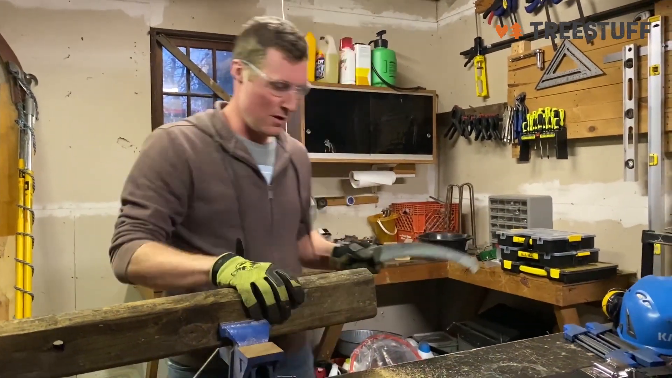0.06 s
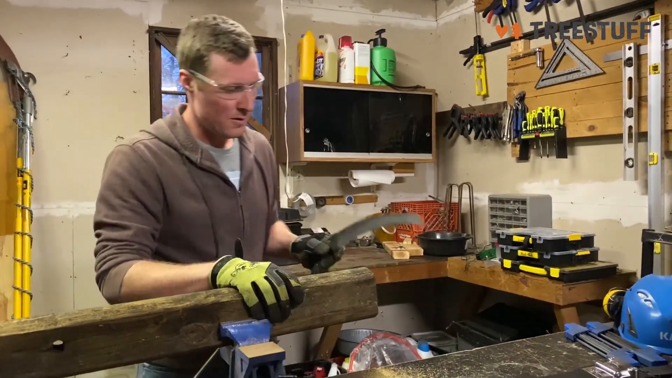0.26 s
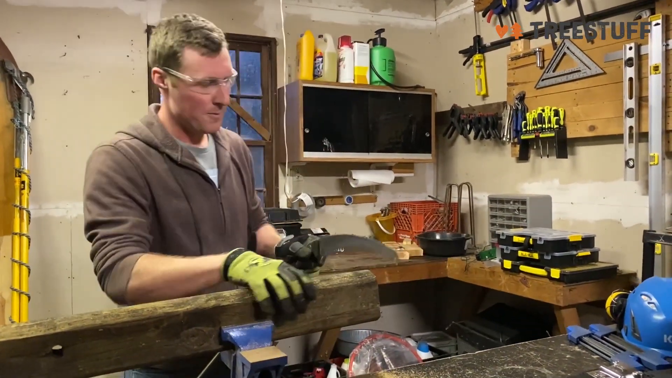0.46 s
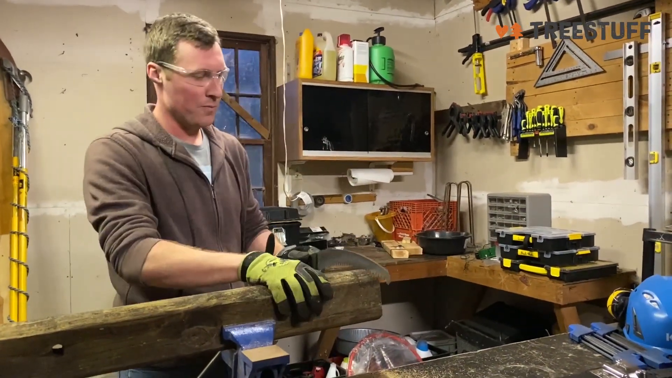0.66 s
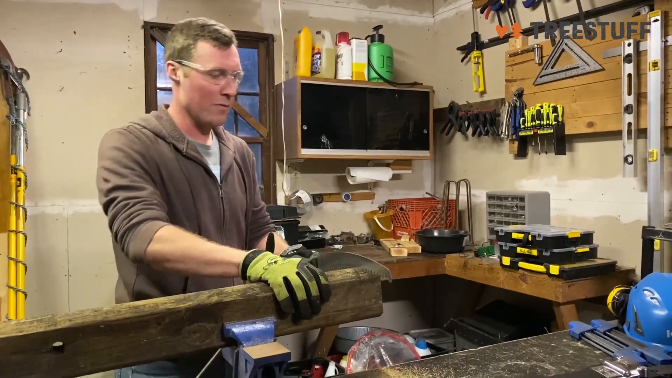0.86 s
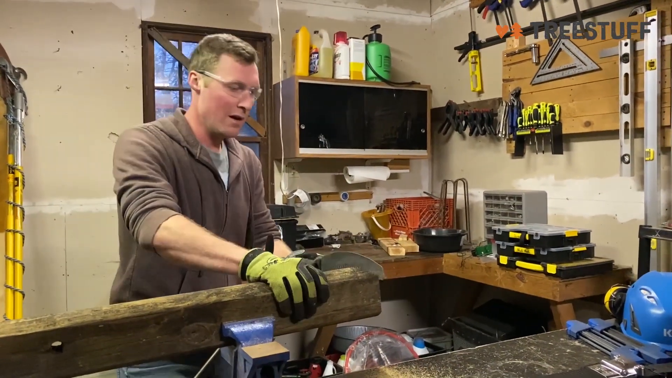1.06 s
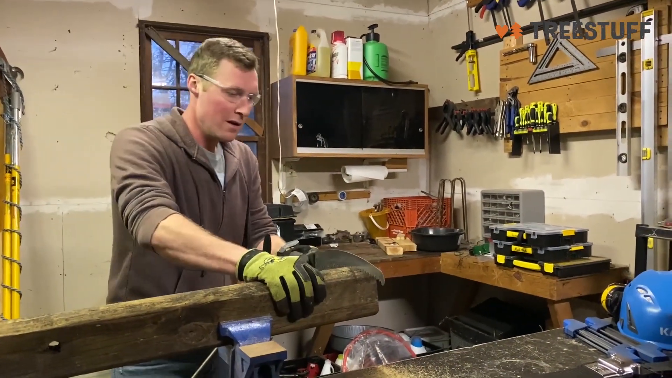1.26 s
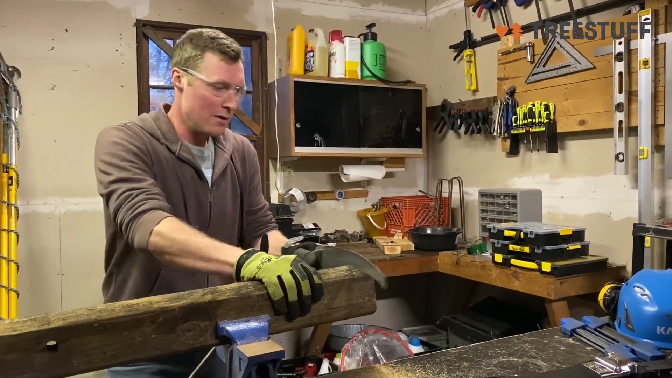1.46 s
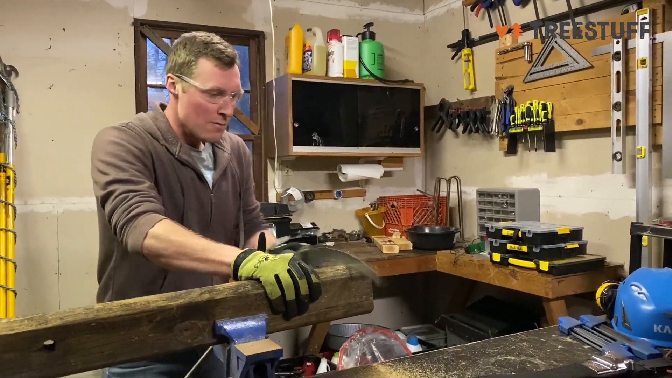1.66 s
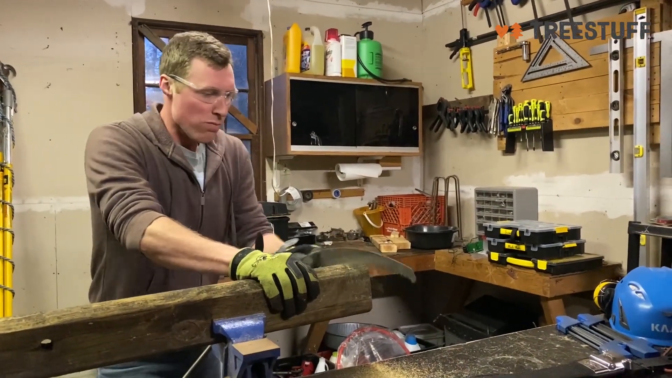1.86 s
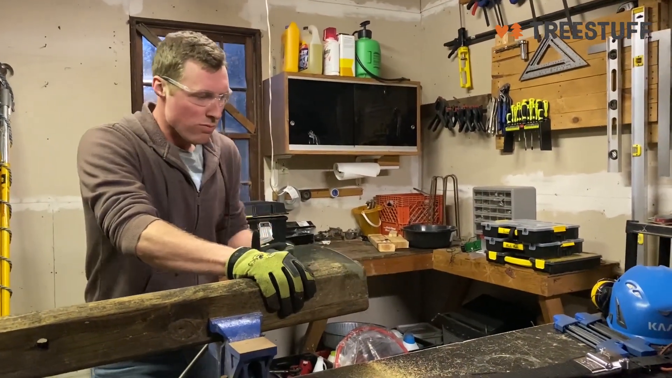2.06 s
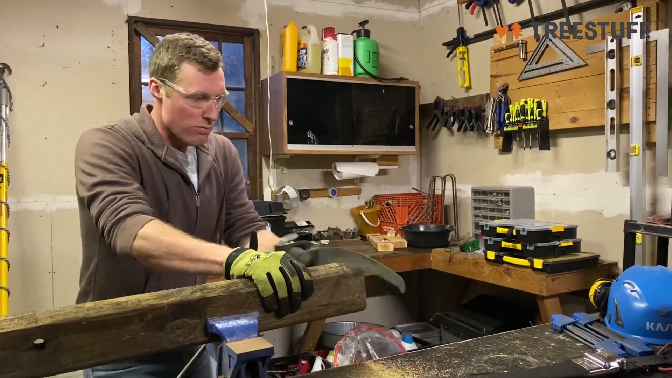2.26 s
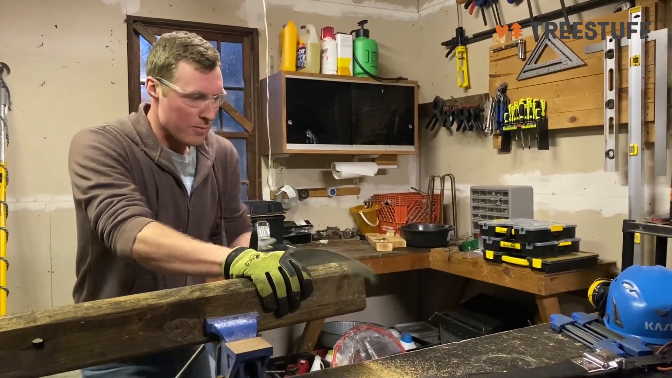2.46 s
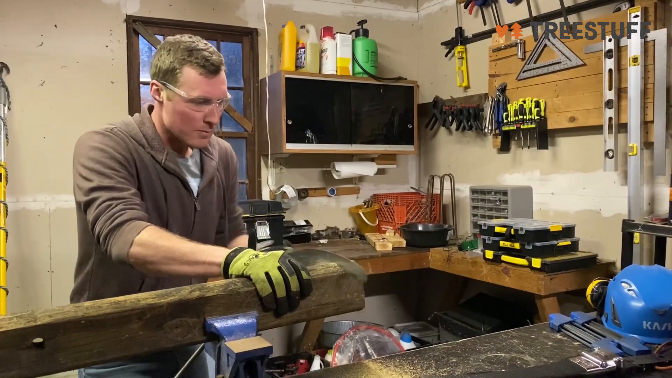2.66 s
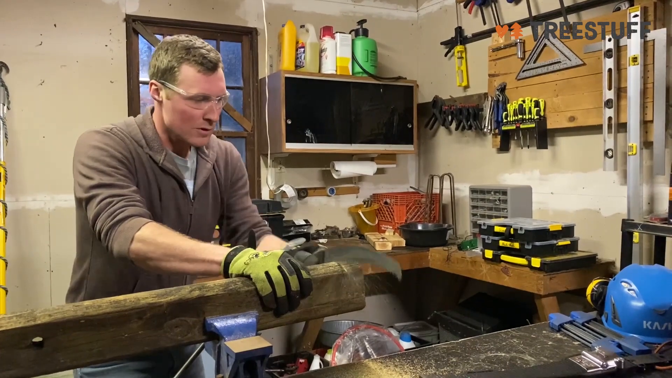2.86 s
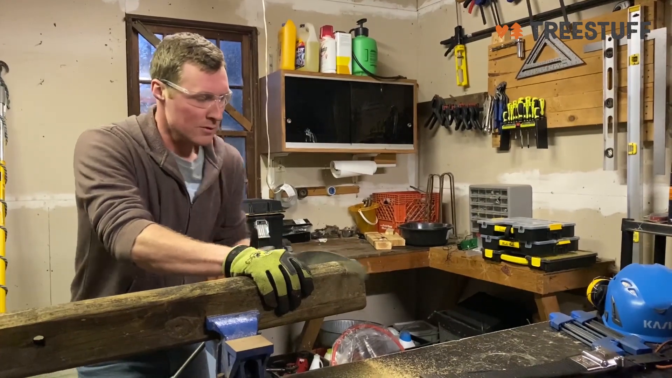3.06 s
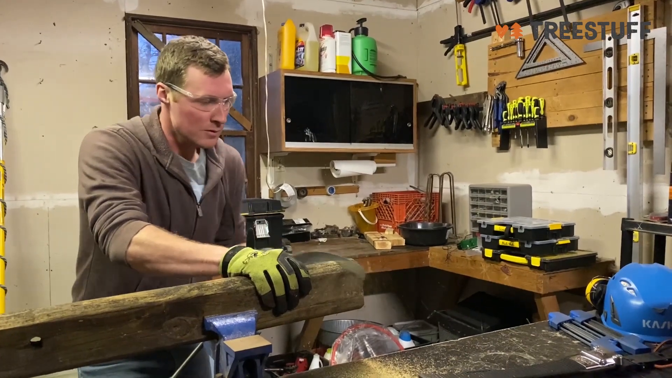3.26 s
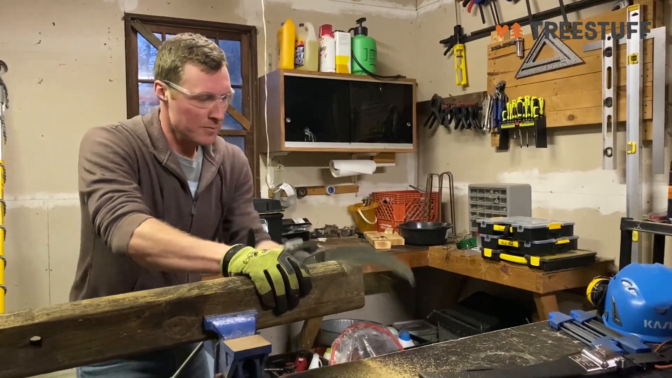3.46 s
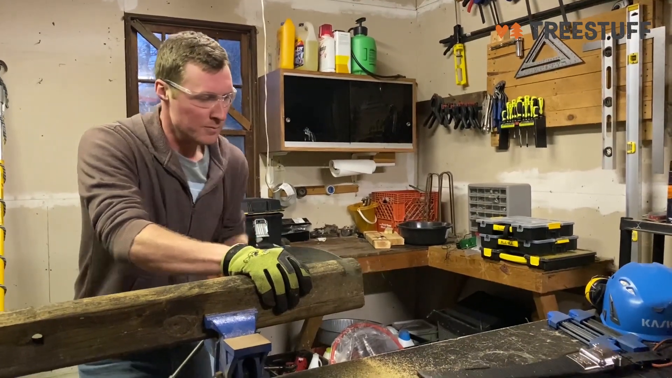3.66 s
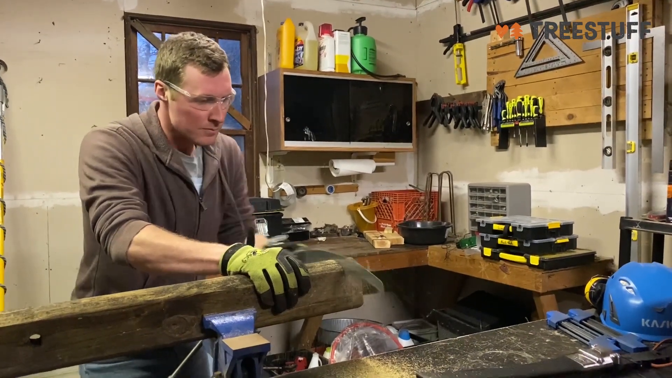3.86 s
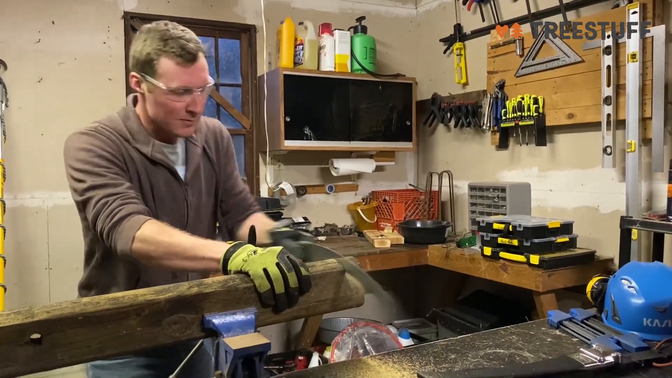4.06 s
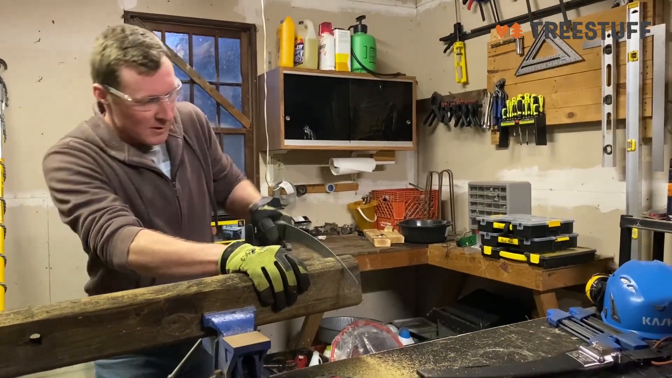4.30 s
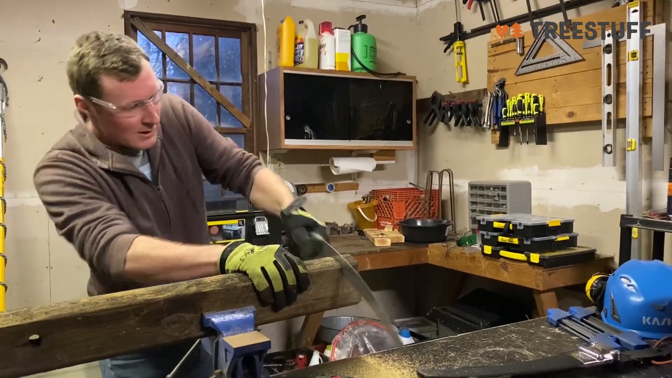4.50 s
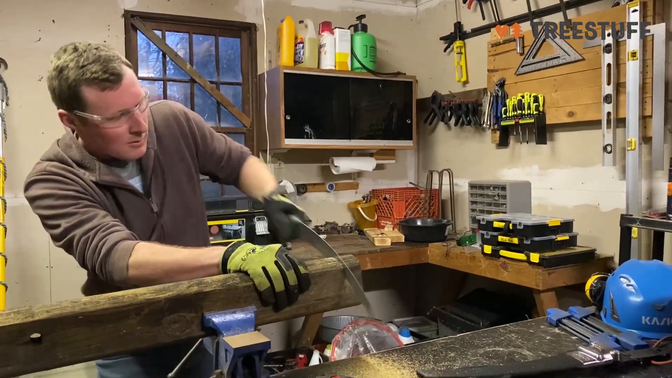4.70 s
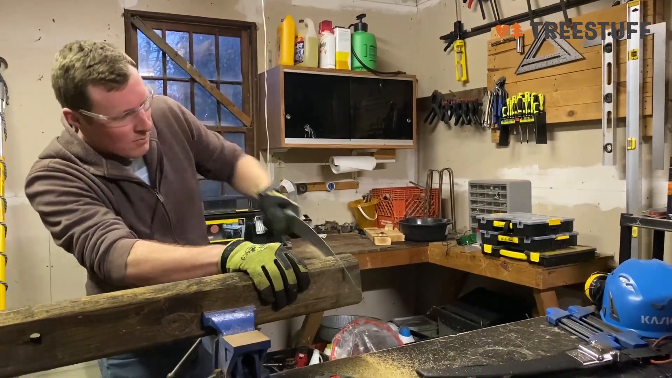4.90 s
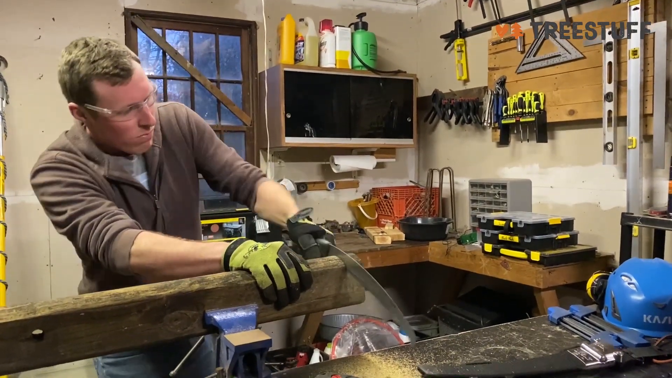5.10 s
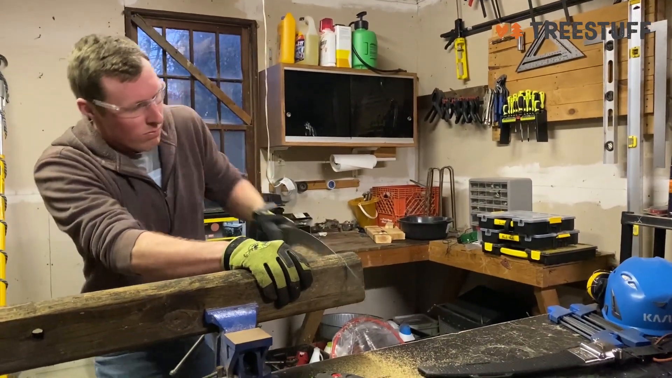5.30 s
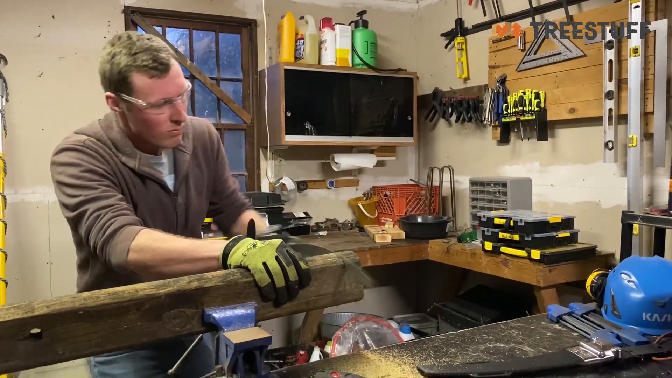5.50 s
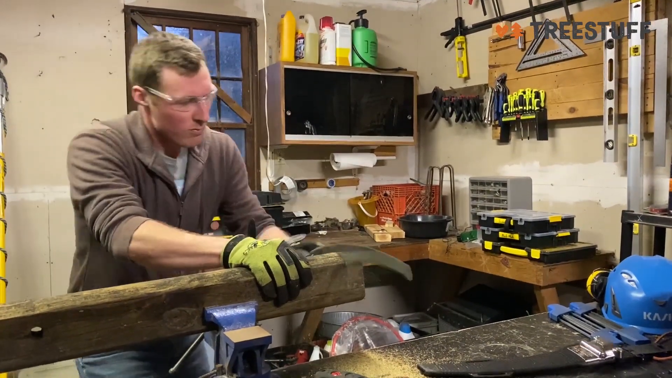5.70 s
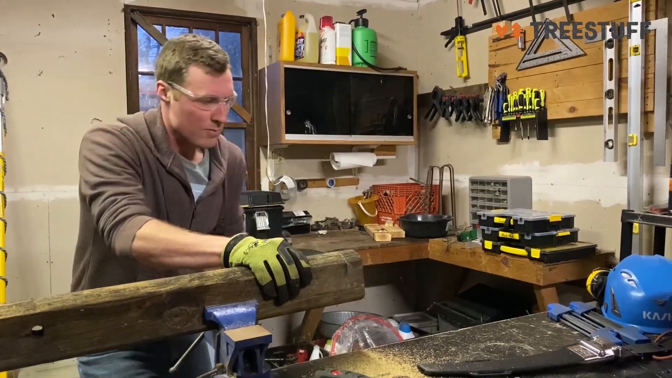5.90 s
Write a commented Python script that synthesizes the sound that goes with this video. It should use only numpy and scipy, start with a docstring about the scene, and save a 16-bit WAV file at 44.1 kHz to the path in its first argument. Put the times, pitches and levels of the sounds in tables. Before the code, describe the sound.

Quiet indoor room noise with faint mains hum. From 0 to 1.5 s, gloves and a saw blade make small dry scuffs on a wooden beam, with steely ticks near 0.13 and 0.5 s, a firm hollow bump with a short rattle at 0.8 s and softer bumps near 0.9, 1.25 and 1.5 s. At 1.5 s sawing begins and continues to 6 s without a real pause: 28 alternating pushes and pulls, each about 0.15 s. Teeth knock the beam into a rough woody buzz around 200-700 Hz; each stroke swells and speeds up midway. Pulls tear more loudly, with gritty mid-range rasp, wavering blade resonance and airy dust hiss, which grows stronger after about 3 s. Bright cracks punctuate some strokes, notably near 2.0, 3.3 and 4.6 s. The vice and bench shudder low underneath. Close stereo pickup, slightly left-weighted, with short room reflections.

```python
"""Over faint room noise and mains hum, gloves and a saw blade slide, tick and bump on a dry beam in a vice.
Then a curved hand saw cuts the beam in quick push and pull strokes: each tooth knocks the ringing beam
and releases a burst of tearing fibres; blade and dust hiss, the bench shakes.
Noise through damped modes and spectral curves, keyed stroke by stroke, reaches two close microphone ports."""
import sys
import numpy as np
from scipy import signal
from scipy.fft import rfft, irfft, next_fast_len
from scipy.io import wavfile
from scipy.ndimage import uniform_filter1d

SR = 44100
rng = np.random.default_rng(int(sys.argv[2]) if len(sys.argv) > 2 else 0)


def transcribe(u):
    """Save the signal u as a 16-bit wav file named by the first command-line argument.

    u: samples, shape (n,) or (channels, n), limited to [-1, 1]; the rate is SR.
    q: integer samples, one column per channel.
    """
    v = np.clip(np.atleast_2d(u).T, -1, 1)
    q = np.round(v * 32767).astype(np.int16)
    wavfile.write(sys.argv[1], SR, q)


def level_to_linear(level):
    """Convert decibel levels to linear amplitude factors, elementwise."""
    exponent = np.asarray(level, float) / 20
    return 10 ** exponent


N = 261954

# room air spectrum: freq_hz, relative_density_db
AIR_CURVE = [(18, -37), (30, 8), (71, 6.5), (199, -6), (473, -8.5), (532, -11.5), (720, -13.5),
             (1180, -18.5), (3070, -28.5), (8000, -34), (10400, -68), (17600, -120)]
AIR_DB = -44
# mains partials: freq_hz, level_db
HUM_PARTIALS = [(360, -63), (479.5, -57.5), (720, -63.5), (840, -66.5)]

# gloves and blade slide over the wood before the cut: start_s, rise_s, hold_s, level_db, thin_top_db
SLIDES = [(-.02, 0.011, .01, -45, -50), (0.095, 0.026, .005, -48, -49), (.205, 0.074, 0.016, -49.5, -47.5),
          (0.373, 0.014, 0.03, -48.5, -40.5), (0.475, .006, 0.025, -42, -58), (0.514, 0.021, .01, -42, -56),
          (0.578, .05, .05, -44.5, -53), (.8, .006, 0.057, -58, -54), (1.152, 0.019, 0.018, -48.5, -49),
          (1.25, 0.011, .004, -38.5, -44), (1.491, .004, 0.016, -59, -55)]
# thin top of sliding and of bright cracks: freq_hz, gain_db
THIN_TOP_CURVE = [(300, -38), (1000, 11.5), (4000, 5.5), (8000, 10), (12000, 4.5), (15700, 4), (15900, -45)]
SLIDE_HZ, SLIDE_WIDTH_HZ = 2620, 2600
RISE_DB, FADE_DB_PER_S, TOP_FADE_DB_PER_S = 18, 195, 260
REST_DB, TOP_REST_DB = -66, -64  # the hand never lies quite still

# tooth tips tick on the wood: start_s, level_db, pitch_hz
TOOTH_TICKS = [(0.1176, -40, 2570), (0.1358, -22, 2980), (0.4808, -16, 3200), (0.4877, -22, 2990),
               (0.502, -27, 2480), (0.804, -29.5, 1710), (1.258, -24, 1980), (1.4934, -40, 2570)]
# short bright cracks with a brief ring, two clicks before the cut, the rest at stroke onsets or
# within strokes: start_s, level_db, ring_hz
BRIGHT_CRACKS = [(0.8015, -31.5, 12100), (0.9687, -38, 14800), (1.5254, -36, 2960), (1.668, -27, 7500),
                 (2.0202, -9.5, 4750), (2.0244, -16, 2570), (2.3483, -15, 7580), (2.3657, -11, 2570),
                 (3.003, -12, 2960), (3.288, -8, 2544), (3.5927, -12, 3388), (3.931, -15, 2980),
                 (4.642, -4, 2890), (4.9077, -9, 2730), (5.139, -6, 5496), (5.339, -12, 3390)]
# the beam is bumped: start_s, level_db, ring_centre_hz, spread_octaves, rattle_t60_s
BEAM_BUMPS = [(.804, -12, 371, 0.27, 0.14), (.882, -26, 360, 0.67, 0.043), (1.255, -27.5, 676, 0.43, 0.058),
              (1.503, -21, 251, 0.43, 0.083)]
# beam in the vice: freq_hz, width_hz, relative_db
BEAM_MODES = [(214, 41, 2.5), (242, 50, 0), (294.8, 9.5, 3.5), (321.3, 52, -1.5), (350.5, 21, -2),
              (391.4, 21, 5), (417, 70, -5.5), (514, 63, 1), (684.4, 3.7, 7), (684, 45, -51)]

# strokes, push and pull in turn:
# start_s, knock_db, early_teeth_hz, late_teeth_hz, tearing_db, hiss_db, bench_db
STROKE_SETTINGS = [(1.5, -13, 299, 221.6, -27.5, -38, -26.5), (1.655, -20, 283.8, 312, -22.5, -34.5, -23.0),
                   (1.851, -15, 394.2, 221.2, -26, -34.5, -25.5),
                   (2.006, -20, 284.1, 308.7, -25, -32.5, -24),
                   (2.194, -13, 214.2, 253.5, -25.5, -34.0, -27),
                   (2.335, -20.5, 240, 325, -22.5, -32, -28.5), (2.521, -13.5, 310, 296.5, -25.5, -33, -30),
                   (2.664, -19.0, 295.1, 297.4, -22, -32.5, -29.0),
                   (2.836, -13, 345, 317.4, -24.5, -32, -27), (2.976, -19, 360.4, 298.8, -20, -31.5, -19.5),
                   (3.142, -17.5, 350, 395, -25, -30.0, -26.5), (3.273, -20, 330.4, 390, -20, -32, -23),
                   (3.439, -13.5, 300, 400, -25.5, -32, -26.5),
                   (3.578, -21.5, 305.3, 396.4, -21, -31.5, -23),
                   (3.754, -17.5, 326.3, 419, -25, -32.0, -24.5),
                   (3.903, -18, 324.9, 383.4, -21.5, -32.5, -29.5),
                   (4.081, -15.5, 367, 402.6, -26.5, -31.5, -29.5),
                   (4.236, -16.5, 380, 295, -22.5, -32.5, -33),
                   (4.419, -14.5, 312.2, 395, -27, -31.5, -20.5),
                   (4.577, -16, 258.3, 329.3, -24, -34.0, -23.5),
                   (4.757, -16, 347.7, 349, -27.5, -30.0, -20.5),
                   (4.895, -15.5, 350, 385.8, -22.0, -31.5, -26.5),
                   (5.068, -18, 335.2, 400, -28.5, -28.5, -24),
                   (5.22, -18.5, 388, 395, -21.0, -31.5, -26.5), (5.392, -18.0, 319, 394, -26.5, -29, -26),
                   (5.523, -18.5, 249.6, 324.3, -22.5, -33, -26),
                   (5.687, -15, 285, 339.7, -25.5, -31.5, -33.5),
                   (5.826, -19.5, 321.4, 330, -20.5, -30, -29.5)]
LAST_S = 6.0  # end of the last stroke
# course of a push: stroke_share_0_1, knock_db, early_to_late_speed_0_1, tearing_db, hiss_db, bench_db
PUSH_COURSE = [(0, -6.5, 0.05, 1.5, -5, -9), (.15, -3.5, 0.02, 2, -3.5, 4.5), (.4, 2.5, .1, 4, 1.5, 5.5),
               (.6, 4.5, .8, 4.5, 4, -4.5), (.8, -1.5, .98, 1.5, 1.5, -2.5), (1, 0.5, 0.94, -3, -6.5, 4)]
# course of a pull: stroke_share_0_1, knock_db, early_to_late_speed_0_1, tearing_db, hiss_db, bench_db
PULL_COURSE = [(0, -5, 0.034, -11, -6.5, -10), (.1, -0.5, 0.023, -1.5, 0.5, -1),
               (.3, 2.5, 0.099, 3, 5, 7.5), (.6, 4.5, .8, 4.5, 3, -1), (.8, 2.5, .98, 0, -2, -2.5),
               (1, -6.5, .98, -4, -10.5, -0.5)]
# the hand halts longer at some turns, so the level dips: centre_s, depth_db, half_length_s
HAND_HALTS = [(1.842, -2.5, 0.017), (2.003, -3, .018), (4.239, -1.5, 0.018), (4.42, -2.5, 0.023),
              (4.566, -1, 0.022), (4.768, -4, 0.025), (5.076, -6.5, 0.026), (5.69, -1, 0.025)]
# the hiss swells briefly within a stroke, from not at all to strongly: centre_s, rise_db, half_length_s
HISS_SWELLS = [(1.55, 4, 0.011), (1.73, 0.5, 0.013), (1.9, 9.5, 0.023), (2.045, 4, .03), (2.24, 5.5, .025),
               (2.365, 3, 0.0081), (2.57, 1, 0.018), (3.21, 0.5, 0.017), (3.54, 0, 0.019),
               (3.81, 6.5, 0.02), (3.935, 2.5, .008), (4.475, 3, 0.0093), (5.175, 6, .012),
               (5.78, 3, 0.021)]
BLEND_S = 0.013  # one stroke melts into the next
START_S, START_DB = 0.039, -44  # the first stroke grows out of rest
CHATTER_DB, ROCK_DB = 1.5, 3.5  # the bite and the bench waver within a stroke

# wood fibres tearing: freq_hz, gain_db
TEAR_CURVE = [(300, -6), (600, 3), (1100, -2), (1800, -14.5), (3000, -11.5), (5000, -21), (8000, -54)]
# teeth on the kerf walls: freq_hz, gain_db
RASP_CURVE = [(500, -50), (1200, -15), (2500, 3.5), (3500, -2), (5000, -1.5), (7000, -1), (9000, -55),
              (11000, -24), (13000, -70)]
# blade in the kerf: freq_hz, width_hz, relative_db
BLADE_MODES = [(1185, 150, 3.5), (1460, 43, 5), (1336, 140, 7), (1644, 167, 15), (1982, 82, 13),
               (2570, 49, 14.5), (2990, 270, 9.5), (3490, 79, 13), (4475, 260, 9.5)]
# blade and dust: freq_hz, gain_db
HISS_CURVE = [(1000, -56), (3000, -2), (6000, -1), (8000, 6.5), (9500, -5.5), (12500, -3.5), (15000, -8.5),
              (15700, -10), (15900, -40), (16600, -55)]
# vice and bench top: freq_hz, width_hz, relative_db
BENCH_TOP_MODES = [(62, 20, -26), (90, 21.4, 8.5), (148, 102, 2)]

# room decay: freq_hz, t60_s
ROOM_DECAY = [(150, 0.14), (400, 0.62), (1000, 0.093), (3000, 0.47), (8000, 0.055)]
# share of sound power that reaches both ports alike: freq_hz, share_0_1
DIRECT_SHARE = [(60, 1), (300, 0.89), (900, 0.39), (1500, 0.74), (2800, 0.88), (4600, 0.89), (5800, 0.16),
                (6900, 1), (16000, 0.78)]
# right port leads: freq_hz, lead_rad
RIGHT_LEAD = [(60, 0.017), (600, 0.18), (1500, -0.82), (3000, -1.23), (4500, -0.68), (6000, -0.86),
              (6900, -1.4)]
# left over right: freq_hz, difference_db
LEFT_OVER_RIGHT = [(60, 2), (380, 3), (950, 1.4), (2400, 3), (5000, 5.5), (7000, 1.5), (16000, 5)]
# above the first, the right channel gains a full cycle on the left in every step of the second
TREBLE_HZ, TREBLE_TURN_HZ = 6786, 4250
EDGE_HZ = 15850


def evened(x):
    """Scales to unit rms."""
    return x / np.sqrt(np.mean(x ** 2) + 1e-20)


def read(points, hz):
    """Interpolates a table over log frequency."""
    f, value = np.transpose(points)
    return np.interp(np.log(hz + 1), np.log(f + 1), value)


def curve(points):
    """Gain against Hz from a dB table."""
    return lambda hz: level_to_linear(read(points, hz))


def columns(points, at):
    """Interpolates every column after the first."""
    s, *values = np.transpose(points)
    return np.array([np.interp(at, s, v) for v in values])


def colour(x, gain):
    """Applies a gain, a function of Hz, in one long spectrum."""
    size = next_fast_len(N + 8192)
    return irfft(rfft(x, size) * gain(np.fft.rfftfreq(size, 1 / SR)), size)[..., :N]


def modes(table, weights=1):
    """Summed response of damped modes, each of unit height before its dB and weight."""
    f, width, db = np.transpose(table)[:, :, None]

    def response(hz):
        damping = 1j * width * hz
        return (weights * level_to_linear(db) * damping / (f ** 2 - hz ** 2 + damping)).sum(0)
    return response


def slow(hz):
    """Unit-rms random wander, low-passed at hz."""
    return evened(signal.lfilter([1], [1, -np.exp(-2 * np.pi * hz / SR)], rng.standard_normal(N)))


def grit(per_s, spread_db, floor):
    """Dense random grains of unequal size over fine noise."""
    size = level_to_linear(spread_db * np.minimum(rng.exponential(1, N), 5))
    size = size * (rng.random(N) < per_s / SR)
    grains = evened(size * rng.standard_normal(N))
    return evened(grains + floor * rng.standard_normal(N))


def swells(table):
    """Sum of Gaussian level changes in dB."""
    t = np.arange(N) / SR
    return sum(db * np.exp(-((t - s) / half) ** 2) for s, db, half in table)


def air():
    """Lumpy room noise and wavering mains partials; the noise is partly alike at the two ports."""
    noise = rng.standard_normal((2, N))
    noise[1] = 0.44 * noise[0] + 0.69 * noise[1]
    lumps = level_to_linear(2 * slow(8))
    rumble = level_to_linear(AIR_DB) * evened(colour(noise * lumps, curve(AIR_CURVE)))
    t = np.arange(N) / SR
    hum = np.zeros(N)
    for hz, db in HUM_PARTIALS:
        level = np.sqrt(2) * level_to_linear(db + 1.1 * slow(2.9))
        hum += level * np.sin(2 * np.pi * (hz * t + rng.random()))
    return rumble + hum


def slide():
    """Fine grit through a broad resonance, under a thin hiss; each slide swells, holds and fades."""
    t = np.arange(N) / SR
    start, rise, hold, level_db, top_db = np.transpose(SLIDES)[:, :, None]
    swell_db = np.where(t < start, -99, -RISE_DB * np.clip(1 - (t - start) / rise, 0, 1))
    after_s = np.maximum(t - start - rise - hold, 0)
    level = level_to_linear(REST_DB) + level_to_linear(level_db + swell_db - FADE_DB_PER_S * after_s).sum(0)
    thin = level_to_linear(TOP_REST_DB) + level_to_linear(top_db + swell_db - TOP_FADE_DB_PER_S * after_s).sum(0)
    # resonance: shift down to 0 Hz, low-pass twice, shift back
    turn = np.exp(2j * np.pi * SLIDE_HZ * t)
    r = np.exp(-np.pi * SLIDE_WIDTH_HZ / SR)
    grains = grit(4000, 1.4, 0.91) * level_to_linear(1.9 * slow(30))
    rub = evened((turn * signal.lfilter([1], [1, -2 * r, r * r], grains / turn)).real)
    top = evened(colour(rng.standard_normal(N), curve(THIN_TOP_CURVE)))
    return level * rub + thin * top


def ticks():
    """Stiff steel: a damped sine with a soft onset, a few cycles long."""
    out, t = np.zeros(N), np.arange(200) / SR
    for s, db, hz in TOOTH_TICKS:
        envelope = level_to_linear(db + 13 - 60 * t / 0.002) * (1 - np.exp(-t / 0.0003))
        out[round(s * SR):][:200] += envelope * np.sin(2 * np.pi * hz * t)
    return out


def bright_cracks():
    """Short bright noise bursts, each with a brief decaying sine ring."""
    out, t = np.zeros(N + 900), np.arange(900) / SR
    for s, db, hz in BRIGHT_CRACKS:
        burst = level_to_linear(-60 * t / 0.008) * rng.standard_normal(900)
        ring = 0.55 * level_to_linear(-60 * t / 0.02) * np.sin(2 * np.pi * hz * t)
        out[round(s * SR):][:900] += level_to_linear(db - 7) * (burst + ring)
    return colour(out[:N], curve(THIN_TOP_CURVE))


def bumps():
    """The blade lands and rattles briefly; the gloved hand damps the beam modes near the blow."""
    out, t = np.zeros(N), np.arange(8000) / SR
    held = np.array(BEAM_MODES) * [1, 1.8, 1]
    for s, db, hz, spread, t60 in BEAM_BUMPS:
        blow = np.zeros(N)
        rattle = rng.standard_normal(8000) * level_to_linear(-60 * t / t60)
        blow[round(s * SR):][:8000] = rattle * (1 - np.exp(-t / 0.0084))
        near = np.exp(-(np.log2(held[:, :1] / hz) / spread) ** 2)
        response = modes(held, near)
        ring = colour(blow, lambda f: response(f) / (1 + (f / (1.25 * hz)) ** 6))
        out += level_to_linear(db) * ring / abs(ring).max()
    return out


def strokes():
    """Controls of the saw: each stroke sets its own levels on the common course of a push or a pull."""
    table, t = np.array(STROKE_SETTINGS), np.arange(N) / SR
    edges = np.append(table[:, 0], LAST_S)
    place = np.interp(t, edges, np.arange(len(edges)))
    which = np.minimum(place.astype(int), len(table) - 1)
    share = place - which
    course = np.where(which % 2, columns(PULL_COURSE, share), columns(PUSH_COURSE, share))
    knock, way, tear, hiss, shake = course
    _, knock_db, early_hz, late_hz, tear_db, hiss_db, shake_db = table[which].T
    controls = [knock_db + knock, early_hz + way * (late_hz - early_hz), tear_db + tear,
                hiss_db + hiss + swells(HISS_SWELLS), shake_db + shake]
    start_db = START_DB * np.clip(1 - (t - edges[0]) / START_S, 0, 1)
    on = (t > edges[0]) * level_to_linear(swells(HAND_HALTS) + start_db)
    return *uniform_filter1d(controls, max(round(BLEND_S * SR), 1), axis=1), on


def beam(turns, bite, knock_db, on):
    """Regular tooth knocks and uneven fibre cracks drive the beam modes."""
    ring = modes(BEAM_MODES)
    even = np.sin(2 * np.pi * turns) * bite
    uneven = colour(grit(900, 3.17, 0.2), modes([(310, 185, 0)]))  # fibres give way between teeth
    push = 0.62 * even / colour(even, ring).std() + 0.78 * uneven / colour(uneven, ring).std()
    return colour(push * level_to_linear(knock_db + CHATTER_DB * slow(24)) * on, ring)


def cutting(burst, tear_db, hiss_db):
    """Tooth bursts gate gritty noise: fibres tear and teeth rasp on the kerf walls."""
    tear = evened(colour(burst * grit(3000, 1.0, 0.93), curve(TEAR_CURVE)))
    rasp_db = 0.46 * tear_db + 0.56 * hiss_db - 3.0  # follows both the bite and the speed
    rasp = evened(colour(burst * grit(2500, 1.7, 1.0), curve(RASP_CURVE)))
    return level_to_linear(tear_db) * tear + level_to_linear(rasp_db) * rasp


def blade(cut):
    """The kerf grips another part of the blade all the time, so its modes come and go."""
    return sum(colour(cut * level_to_linear(4.33 * slow(2.5) - 12), modes([mode])) for mode in BLADE_MODES)


def dust(burst, hiss_db):
    """Blade and dust hiss in tooth bursts; the finest dust favours full speed."""
    hiss = evened(colour(burst * grit(5000, 0.44, 1.0), curve(HISS_CURVE)))
    fine = curve(HISS_CURVE)
    fizz = evened(colour(burst * grit(2800, 2.8, 0.59), lambda hz: fine(hz) * (hz / 15000) ** 3))
    return level_to_linear(hiss_db) * hiss + level_to_linear(1.23 * hiss_db + 10.0) * fizz


def saw():
    """Teeth pass at the stroke speed: each knocks the beam and releases a burst of tearing."""
    knock_db, teeth_hz, tear_db, hiss_db, _, on = strokes()
    turns = np.cumsum(teeth_hz * (1 + 0.04 * slow(40))) / SR  # teeth passed
    bite = level_to_linear(0.73 * rng.standard_normal(3000))[turns.astype(int)]  # no two teeth are alike
    burst = bite * (2.1 + np.exp(-(turns % 1) / 0.32)) * level_to_linear(2.0 * slow(27))
    cut = cutting(burst, tear_db, hiss_db)
    return beam(turns, bite, knock_db, on) + on * (cut + blade(cut) + dust(burst, hiss_db))


def bench():
    """The strokes rock the vice and the bench top: noise through low damped modes."""
    *_, level_db, on = strokes()
    shake = evened(colour(rng.standard_normal(N), modes(BENCH_TOP_MODES)))
    return level_to_linear(level_db + ROCK_DB * slow(5)) * shake * on


def room(x, count=5):
    """Sparse taps, each band dying at its own speed; the source moves, so several tails take turns."""
    taps = np.zeros((count, 2, SR // 2))
    grid = np.arange(100, SR // 2 - 20, 20)
    at = grid + rng.integers(0, 20, (count, 2, len(grid)))
    np.put_along_axis(taps, at, rng.choice([-1., 1.], at.shape), 2)
    hz, t, z = signal.stft(taps, SR, nperseg=256)
    t60_s = read(ROOM_DECAY, hz)[:, None]
    tails = signal.istft(z * level_to_linear(-60 * t / t60_s) / np.sqrt(t60_s), SR, nperseg=256)[1]
    tails = tails / np.linalg.norm(tails[0, 0])
    place = (np.arange(N) / SR * 12 - np.arange(count)[:, None]) % count - 1  # 12 tails per second
    fade = np.cos(np.pi / 2 * np.clip(place, -1, 1))
    return signal.fftconvolve((x * fade)[:, None], tails, axes=2).sum(0)[:, :N]


def scene():
    """Direct sound with port phase lead, room tails and air, balanced left to right."""
    work = slide() + ticks() + bright_cracks() + bumps() + saw() + bench()
    share = lambda hz: np.clip(read(DIRECT_SHARE, hz), 0, 1)
    sides = np.array([[-0.5], [0.5]])
    direct = colour(work, lambda hz: np.sqrt(share(hz)) * np.exp(1j * sides * read(RIGHT_LEAD, hz)))
    walls = colour(room(work), lambda hz: np.sqrt(1 - share(hz)))
    return colour(direct + walls + air(), lambda hz: level_to_linear(-sides * read(LEFT_OVER_RIGHT, hz)))


def low_pass(x):
    """Removes everything above the highest recorded frequency."""
    return signal.sosfilt(signal.butter(12, 16820, fs=SR, output="sos"), x)


def record(dry):
    """Deep bass is cut, peaks rounded; the treble is shared, turns between channels, drops at its edge."""
    heard = signal.sosfilt(signal.butter(3, 55, "high", fs=SR, output="sos"), dry)
    rounded = 0.72 * np.tanh(heard / 0.72)
    sides = np.array([[-1], [1]])
    shared = lambda hz: np.clip((hz - TREBLE_HZ) / 1000 + 1, 0, 1)
    turn = lambda hz: np.exp(1j * np.pi * sides * np.maximum(hz - TREBLE_HZ, 0) / TREBLE_TURN_HZ)
    edge = lambda hz: level_to_linear(-12 * np.clip((hz - EDGE_HZ) / 150, 0, 1))
    treble = colour(rounded.mean(0), lambda hz: shared(hz) * turn(hz) * edge(hz))
    mix = colour(rounded, lambda hz: 1 - shared(hz)) + treble
    return low_pass(mix)


dry = scene()
out = record(dry)
transcribe(out)
```